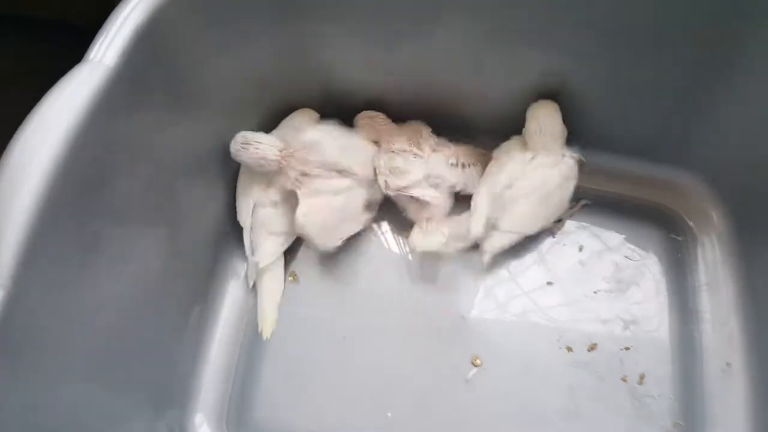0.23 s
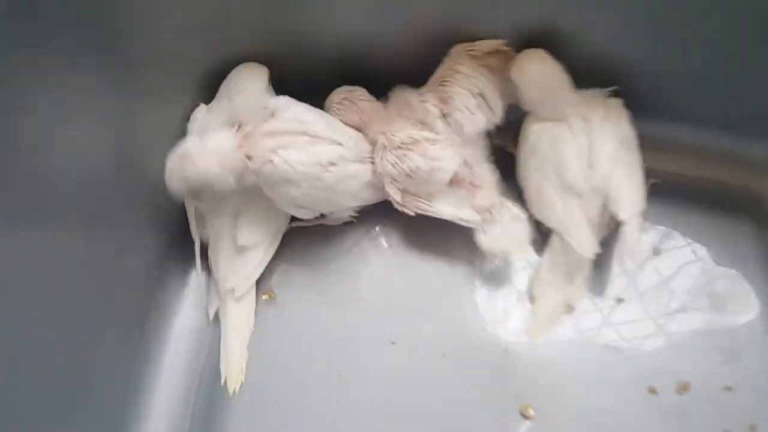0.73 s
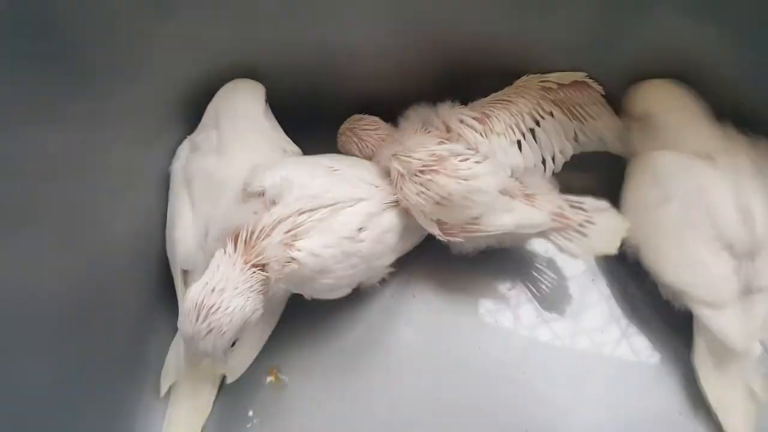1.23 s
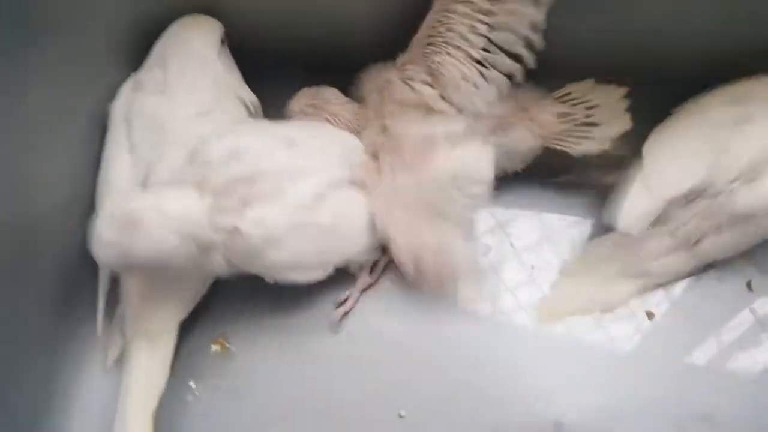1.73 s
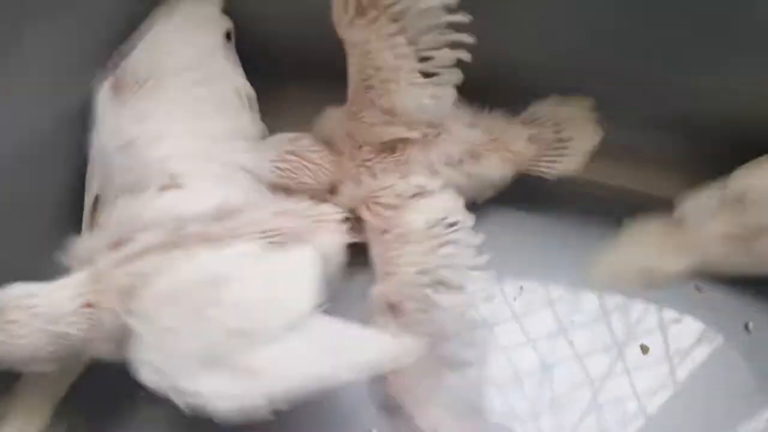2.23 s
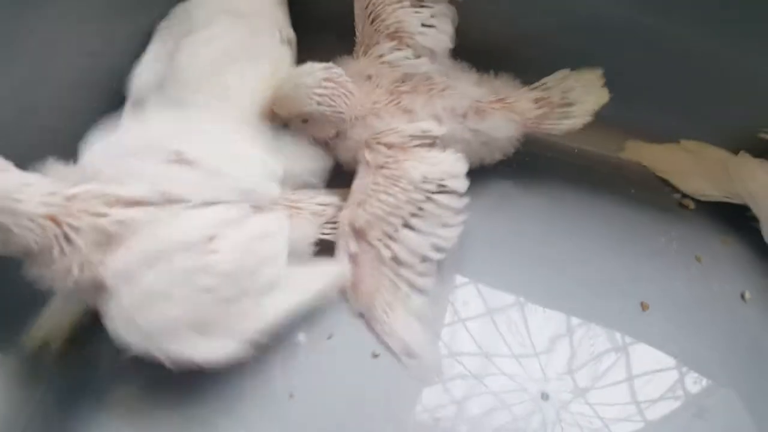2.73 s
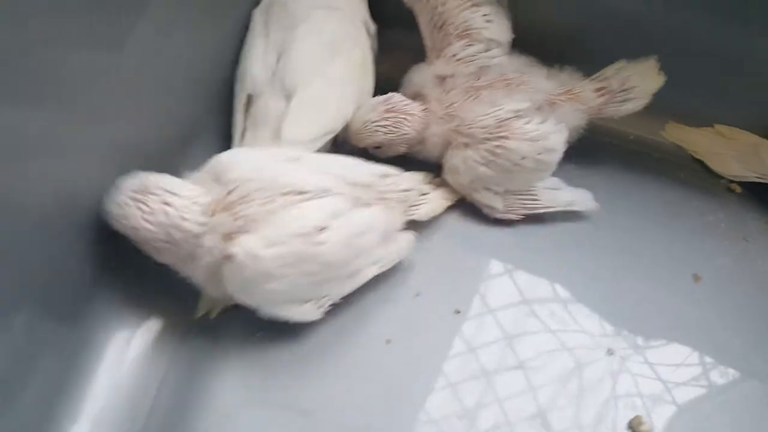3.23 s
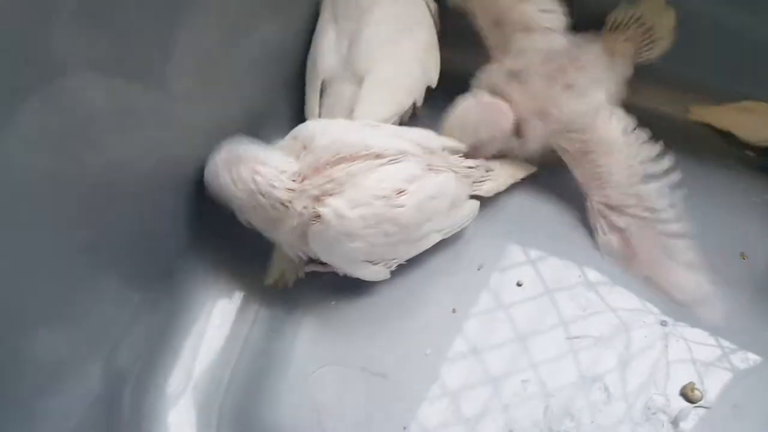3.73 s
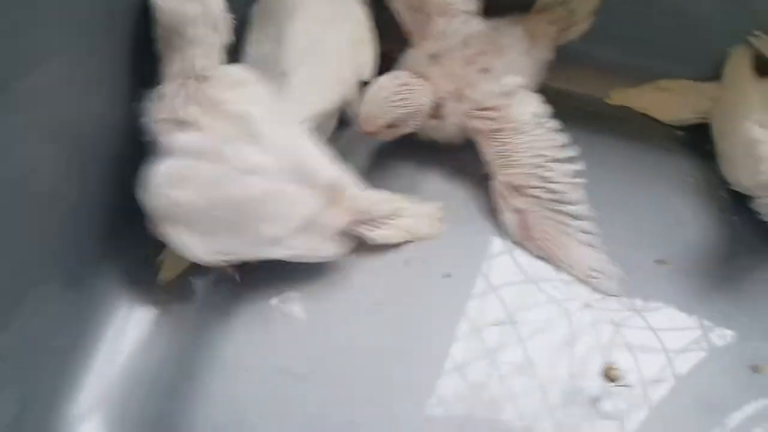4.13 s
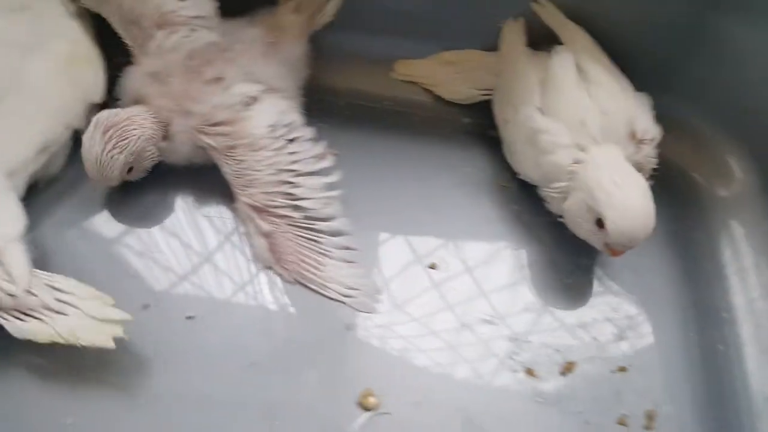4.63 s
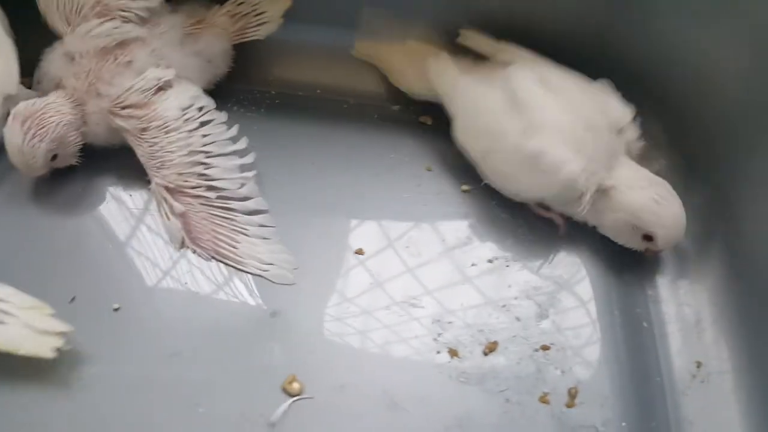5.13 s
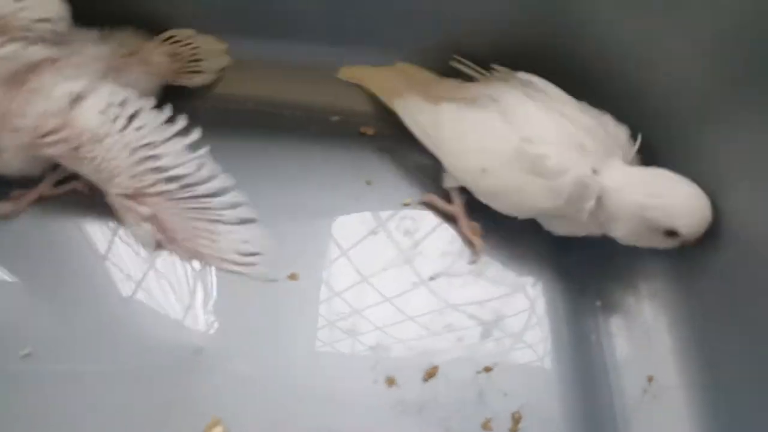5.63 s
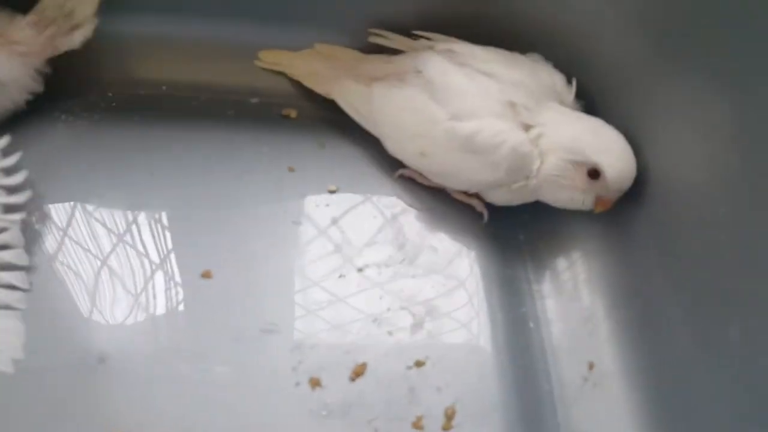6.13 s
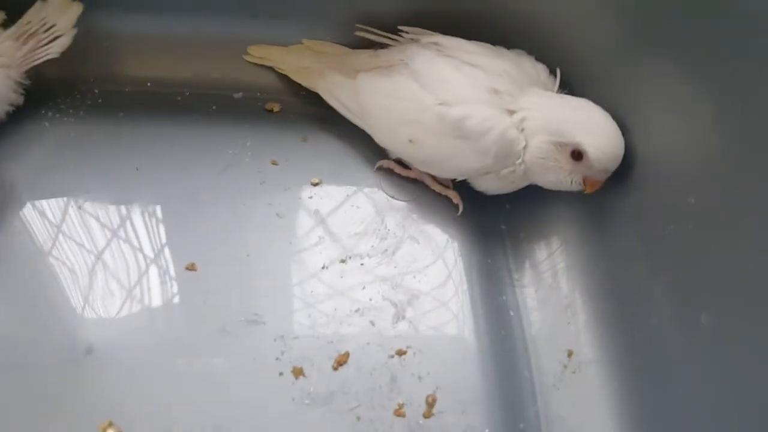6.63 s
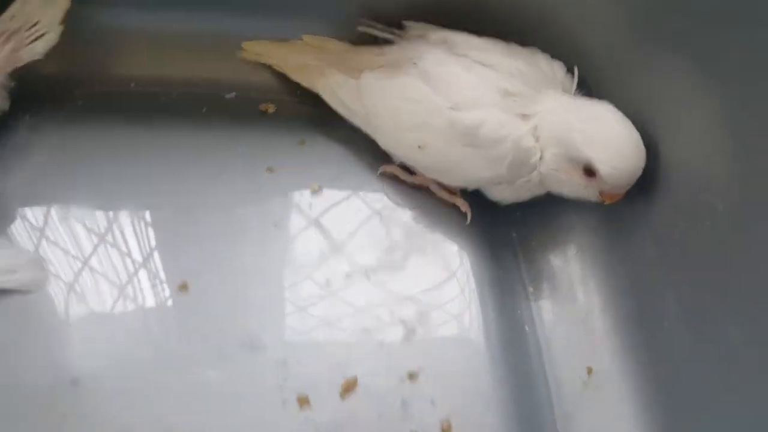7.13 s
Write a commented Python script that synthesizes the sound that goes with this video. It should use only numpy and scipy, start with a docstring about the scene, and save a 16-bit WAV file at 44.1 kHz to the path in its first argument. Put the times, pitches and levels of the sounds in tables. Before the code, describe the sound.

Young budgerigar chicks give shrill wavering cheeps and one harsh squawk while feet and wings knock and claws scratch on a plastic tub.

```python
"""Indoors, in a plastic tub: budgerigar chicks beg close to two microphone ports, the left one nearer.
Warbling cheeps and one harsh squawk are sines of unsteady pitch; the squawk adds chopped breath noise.
Feet and wings knock on the tub floor, a bank of ringing modes; claws tick and slide in noise grains.
Feathers rustle as hiss and crackle, a wing swishes as a puff of noise, and a lumpy rumble lies beneath.
Tub walls and room add echoes to voices, knocks and claws."""
import sys
import numpy as np
from scipy import signal
from scipy.fft import rfft, irfft, next_fast_len
from scipy.io import wavfile
from scipy.ndimage import uniform_filter1d

SR = 44100
rng = np.random.default_rng(int(sys.argv[2]) if len(sys.argv) > 2 else 0)


def waveform_to_disk(signal):
    """Save audio, clipped to [-1, 1], as 16-bit WAV at the path in sys.argv[1]."""
    frames = np.transpose(np.atleast_2d(signal))
    scaled = np.clip(frames, -1, 1) * 32767
    samples = np.round(scaled).astype(np.int16)
    wavfile.write(sys.argv[1], SR, samples)


N = 326340
T = np.arange(N) / SR

# bustle of the shuffling chicks: (time [s], relative level [dB])
SHUFFLE = [(0, -62), (.14, -73.5), (.3, -58), (.55, -79), (.75, -67.5), (2.3, -57), (2.55, -63.5),
           (2.9, -59), (3.4, -78), (3.7, -64), (4.2, -59), (4.62, -73), (4.9, -64), (5.08, -68),
           (5.3, -62.5), (6.75, -64.5), (6.95, -75), (7.1, -62.5)]
# rumble spectrum: (frequency [Hz], relative density [dB per Hz])
AIR_SPECTRUM = [(25, 6.5), (166, 12.5), (400, -14.5), (900, -7.5), (1300, -20), (4370, -40.5), (16000, -34)]
AIR_DB = -58
AIR_FOLLOWS, AIR_LUMPS_DB = 0.75, 2  # share of the bustle's dB that the rumble follows; its own unevenness

# claws scraping on plastic, also the feather hiss: (frequency [Hz], relative density [dB per Hz])
SCRAPE_SPECTRUM = [(600, -0.5), (1200, 2), (2300, 3), (4300, -4.5), (9000, -6), (16000, -14)]
# feet and wings on the tub floor: (time [s], relative level [dB])
KNOCKS = [(0.175, -38.5), (0.214, -27.5), (0.293, -16), (0.405, -22), (0.629, -33.5), (0.866, -21),
          (0.995, -23), (1.146, -26), (1.291, -17), (1.335, -16), (1.492, -18), (1.67, -24), (1.752, -18),
          (1.838, -22.5), (1.908, -12.5), (1.932, -20), (2.097, -16), (2.143, -12), (2.249, -19.5),
          (2.264, -17.5), (2.371, -10.5), (2.659, -18.5), (2.689, -17.5), (2.758, -15.5), (2.995, -27),
          (3.118, -31), (3.179, -21.5), (3.487, -40.5), (3.51, -34), (3.652, -32), (3.704, -30),
          (3.786, -20), (4.037, -25), (4.178, -23), (4.412, -33), (4.672, -40), (4.924, -23.5),
          (5.137, -23), (5.167, -10), (5.281, -22.5), (5.349, -14.5), (5.545, -29.5), (5.582, -18.5),
          (5.643, -26.5), (5.998, -18), (6.026, -26), (6.12, -37), (6.463, -33.5), (6.742, -34),
          (7.057, -29), (7.13, -28.5), (7.235, -53)]
# ringing modes of the floor: (frequency [Hz], level [dB], decay by 60 dB [s])
FLOOR_MODES = [(192.5, -1.5, 0.036), (315.4, -0.5, 0.056), (388, -14, 0.072), (453, 5.5, 0.018),
               (514, 8.5, 0.003), (828, 5.5, 0.015), (1550, 8, 0.00388)]
STRIKE_SPREAD_DB = 3.5  # every knock lands elsewhere and stirs the modes differently
HARD_HZ = 664  # a foot is soft: modes above this are driven less
PANEL_HZ, PANEL_LAG_S = 600, 0.00036  # floor modes above this reach the ports out of step
# claw ticks: (time [s], relative level [dB])
CLAW_TICKS = [(0.409, -16.5), (0.88, -25.5), (1.001, -24.5), (1.295, -15), (1.466, -28), (1.6643, -14),
              (1.749, -15.5), (1.928, -12), (2.0101, -30), (2.1263, -11.5), (2.371, -18), (2.4817, -28.5),
              (3.515, -26), (3.537, -28), (3.6595, -21), (3.706, -26.5), (4.1661, -12.5), (4.383, -19.5),
              (5.168, -26), (5.284, -20.5), (5.3335, -23), (5.462, -26), (5.613, -23), (5.899, -45),
              (5.922, -28), (6.439, -31), (6.49, -33)]
SLIDE_S = 0.011  # nominal 60 dB decay of a slide; each claw scales it by chance

# begging cheeps in order of time: (left minus right [dB], octave overtone [dB],
# third overtone [dB], first level [dB], middle level [dB], last level [dB])
CHEEPS = [(3.5, -1, -29, -35, -38, -46.5), (10.5, -12, -14.5, -25, -23, -23), (2, 12.5, 1, -35, -32.5, -42),
          (1, -2.5, -13.5, -21.5, -20, -18), (7.5, -19.5, -17, -29, -22, -16.5),
          (2.5, 14, -13, -36, -32.5, -44), (9.5, -2.5, -6.5, -27.5, -19, -20),
          (8, 11, -3, -30, -36.5, -38.5), (13.5, -12, -1.5, -38.5, -25, -24.5),
          (10, 5.5, 11, -38, -42, -43), (8.5, 11, 3.5, -37, -24.5, -30), (11, 10.5, -3, -23.5, -29, -30)]
# zigzag course of each loud cheep: (time [s], pitch [Hz])
LOUD_PITCH = [
    [(1.551, 2848), (1.589, 3417), (1.617, 2660), (1.701, 3352), (1.727, 2745), (1.813, 3090), (1.85, 2270)],
    [(2.714, 3017), (2.736, 3543), (2.808, 2674), (2.826, 3543), (2.836, 2848), (2.944, 2966),
     (3.006, 2319)],
    [(3.716, 2579), (3.728, 3056), (3.786, 3130), (3.8, 2671), (3.83, 3092), (3.992, 2906), (4.006, 2302)],
    [(4.691, 2459), (4.721, 3400), (4.783, 2622), (4.809, 3400), (4.893, 2556), (4.909, 3135),
     (4.977, 2394)],
    [(5.955, 2801), (6.031, 3125), (6.043, 2706), (6.077, 3303), (6.199, 2884), (6.217, 3277),
     (6.287, 2637)],
    [(6.991, 2915), (7.023, 3102), (7.085, 2826), (7.107, 3072), (7.259, 2624), (7.275, 2168),
     (7.283, 2282)],
]
# course of each soft cheep: (time [s], pitch [Hz])
SOFT_PITCH = [
    [(0.724, 3420), (0.844, 3090), (1.0, 3150)],
    [(2.162, 3197), (2.308, 3117), (2.406, 2697)],
    [(4.065, 3480), (4.097, 3650), (4.337, 3136)],
    [(5.172, 3816), (5.284, 3280), (5.419, 3260)],
    [(6.29, 2716), (6.314, 3440), (6.531, 3092)],
    [(7.285, 3595), (7.337, 3188), (7.4, 3400)],
]
COURSES = sorted(list(LOUD_PITCH) + list(SOFT_PITCH), key=lambda rows: rows[0][0])
# unsteady syrinx: (rate [per s], pitch depth [share], level depth [dB])
WARBLE = [(40, .045, 3), (120, .045, 5), (330, .025, 3.5)]
# throat colour on the overtones: (frequency [Hz], level [dB])
THROAT = [(4500, -11), (5500, -18), (6300, -33.5), (9200, -25.5), (12000, -43.5)]
LOW_LOUDER_DB = 9  # low notes come out louder, per kHz under 3 kHz
SECOND_SIDE_DB = -6  # the weaker side of the syrinx beats with the first
CRACKS_PER_S, CRACK_DROP, CRACK_S = 60, .42, .006  # random downward cracks: pitch drop scale [share]
FLUTTER_PER_S, FLUTTER, HOARSE = 600, .045, .9  # pitch flutter scale [share], and how hoarse the voice is
HALF_LINE_DB = -27  # a line at 1.5 times the pitch, before the throat colour

# squawk: (time [s], relative level [dB])
SQUAWK = [(3.162, -36.5), (3.174, -16.5), (3.225, -17.5), (3.247, -24)]
# squawk pitch and its multiples in order: (level [dB])
SQUAWK_PARTIALS_DB = [-37, 4, -32, -12.5, -11.5]
# breath noise in the squawk: (frequency [Hz], relative density [dB per Hz])
SQUAWK_RASP = [(290, -68.5), (500, -38.5), (1090, -11), (2230, 3), (4150, -16.5), (5390, -2), (8090, -14),
               (11800, -34.5), (16000, -35.5)]
SQUAWK_HZ, SQUAWK_RATE_HZ = 2320, 170  # middle pitch; rate of its bursts
SQUAWK_SWING = 0.19  # the pitch arches by this share in every burst
SQUAWK_ROOM_DB = -21  # the squawk rings longer in the room

# echoes off the tub walls, the delay stretched at each port: (delay [s], level [dB])
WALL_ECHOES = [(.0009, -13), (.0023, -10), (.0041, -10)]
ROOM_T60_S, ROOM_DB, ROOM_CUT_HZ = 0.21, -24.5, 9000
PORT_LAG_S, CHEEP_LAG_S = 0.000332, .00027  # the right port hears later
# how the ports colour a voice: (frequency [Hz], left minus right [dB])
PORT_SIDE = [(700, -5), (1290, 5), (2380, -2.5), (4400, -8.5), (9000, -7), (15000, 4.5)]
# the ports move over the tub: (time [s], left minus right [dB])
SCUFFLE_PAN = [(0, -1), (2.7, -0.5), (3.8, -3), (5, 2), (7.4, 7)]
CUTOFF_HZ = 16650


def amp(db):
    """Amplitude of a level in dB."""
    return 10 ** (np.asarray(db) / 20)


def unit(x):
    """Scales a signal to rms 1."""
    return x / np.sqrt(np.mean(x ** 2) + 1e-20)


def columns(rows):
    """Draws each column of a table as a line over time."""
    s, *rest = np.transpose(rows)
    return [np.interp(T, s, c) for c in rest]


def drift(rate):
    """Smooth random wandering of rms near 1, quicker at a higher rate."""
    r = np.exp(-3 * np.pi * rate / SR)
    smoother = [1, -2 * r, r * r]
    slow = signal.lfilter([1], smoother, rng.standard_normal(N + 9000))
    return unit(signal.lfilter([1], smoother, unit(slow))[9000:])


def spectrum_line(spectrum):
    """dB at every FFT frequency, interpolated over log frequency."""
    hz, db = np.transpose(spectrum)
    return np.interp(np.log(np.fft.rfftfreq(N, 1 / SR) + 1), np.log(hz), db)


def colour(x, spectrum):
    """Shapes noise by a spectrum in dB per Hz; white noise of rms 1 keeps about that rms."""
    return irfft(rfft(x) * unit(amp(spectrum_line(spectrum))), N)


def gate(start, end, edge_s):
    """Opens to 1 between two times, with straight edges."""
    return np.clip(np.minimum(T - start, end - T) / edge_s, 0, 1)


def grains(per_s, spread_db):
    """Random clicks; the wider the spread, the more a few outgrow the rest."""
    sizes = amp(spread_db * np.minimum(rng.exponential(1, N), 4)) * rng.choice([-1, 1], N)
    return unit(sizes * (rng.random(N) < per_s / SR))


def air_rumble(bustle_db):
    """Lumpy noise that rises with the bustle, mostly shared by the ports."""
    shared, left, right = [colour(rng.standard_normal(N), AIR_SPECTRUM) for draw in range(3)]
    follow_db = AIR_FOLLOWS * (bustle_db - bustle_db.mean())
    level = amp(AIR_DB + follow_db + AIR_LUMPS_DB * drift(9.6))
    return level * (shared + .4 * np.array([left, right]))


def feathers(rustle_db):
    """Soft hiss, its own at each port, with a shared fine dry crackle of quills on plastic."""
    clumps = amp(rustle_db + 6 + 2.5 * drift(25))
    ticks = .9 * grains(110 * amp(7.0 * drift(10)), spread_db=4.0)
    quill = unit(rng.standard_normal(130) * np.hanning(130)) / np.sqrt(130)
    ticks = np.convolve(ticks, quill, "same")
    return [clumps * colour(rng.standard_normal(N) + ticks, SCRAPE_SPECTRUM) for port in range(2)]


def tub_floor(rumble_db):
    """Knocks, small random pats and steady rubbing drive the floor modes; soft contacts miss the high ones."""
    pats = amp(rumble_db - 21.5) * grains(60 * amp(5.5 * drift(3.9)), spread_db=3.5)
    rubbing = amp(rumble_db - 39.0) * rng.standard_normal(N)
    soft_contact = np.hanning(30) / 15
    pats = np.convolve(pats + rubbing, soft_contact)[:N]

    scuffs = np.zeros(N)  # the foot drags on after each knock
    for (s, db), drag_s in zip(KNOCKS, rng.uniform(0.022, 0.17, len(KNOCKS))):
        scuffs[round(s * SR):][:4000] += amp(db - 37 - 60 * T[:4000] / drag_s)
    pats += scuffs * grains(700, spread_db=2.5)

    low_high = np.zeros((2, N))
    chance = rng.normal(0, 1, (len(KNOCKS), len(FLOOR_MODES)))
    for k, (hz, mode_db, t60) in enumerate(FLOOR_MODES):
        force = pats.copy()
        softness = 1 + (hz / HARD_HZ) ** 2
        for (s, db), luck in zip(KNOCKS, chance):
            force[round((s + .002) * SR)] -= amp(db - 6.5 + STRIKE_SPREAD_DB * luck[k]) / softness
        r, w = amp(-60 / (t60 * SR)), 2 * np.pi * hz / SR
        resonator = [0, np.sin(w)], [1, -2 * r * np.cos(w), r * r]
        low_high[int(hz > PANEL_HZ)] += amp(mode_db) * signal.lfilter(*resonator, force + 1e-18)
    # a thin floor radiates little bass
    return signal.sosfilt(signal.butter(2, 220, "high", fs=SR, output="sos"), low_high)


def claws():
    """Each claw ticks, then slides in dense tiny slips that die away."""
    level = np.zeros(N)
    for (s, db), luck in zip(CLAW_TICKS, rng.uniform(0.053, 2.6, len(CLAW_TICKS))):
        at = round(s * SR)
        level[at:at + 3000] += amp(db - 6.0 - 60 * T[:3000] / (luck * SLIDE_S))
    slips = colour(grains(7700, spread_db=0.0), SCRAPE_SPECTRUM)
    return uniform_filter1d(level, size=90) * slips


def per_call(column):
    """A column of the cheep table, held until each call ends."""
    ends = sorted(rows[-1][0] for rows in COURSES)
    call = np.minimum(np.searchsorted(ends, T - .012), len(ends) - 1)
    return uniform_filter1d(np.array(CHEEPS, float)[call, column], size=300)


def syrinx_side(level, pitch):
    """A near sine that zigzags, cracks and flutters about the course it is given."""
    strain = np.clip((pitch - 2150) / 750, .2, 1)  # low notes hold steadier
    for rate, share, shake_db in WARBLE:
        pitch = pitch * np.exp(strain * share * np.tanh(drift(rate)))
        level = level * amp(strain * shake_db * np.tanh(drift(rate)))
    fits = np.maximum(1 + drift(42.1), 0)  # the hoarse flutter comes in fits
    pitch = pitch * np.exp(strain * HOARSE * FLUTTER * fits * np.tanh(drift(FLUTTER_PER_S)))

    crack_len = round(CRACK_S * SR)
    crack_shape = signal.windows.tukey(crack_len, .4) * np.linspace(1.2, 0, crack_len)
    cracks = np.tanh(np.convolve(rng.random(N) < CRACKS_PER_S / SR, crack_shape)[:N])
    turn = 2 * np.pi * np.cumsum(pitch * (1 - strain * CRACK_DROP * cracks)) / SR

    voice = np.sin(turn)
    for k, own_db in [(1.5, HALF_LINE_DB), (2, per_call(1)), (3, per_call(2))]:
        throat_db = np.interp(k * pitch, *np.transpose(THROAT)) + own_db
        overtone = np.sin(k * turn + .55 * drift(500))
        voice += amp(throat_db + 11 * np.tanh(drift(110))) * overtone
    return level * voice * (1 - .45 * cracks)


def cheeps():
    """Each call follows its course; both sides of the syrinx sing it, each unsteady in its own way."""
    pitch, = columns(np.concatenate(COURSES))
    db, on = np.full(N, CHEEPS[0][3], float), 0
    for rows, (*_, first_db, mid_db, last_db) in zip(COURSES, CHEEPS):
        start, end = rows[0][0], rows[-1][0]
        times = [start, (start + end) / 2, end]
        db[T >= start] = np.interp(T[T >= start], times, [first_db, mid_db, last_db])
        on = on + gate(start - .004, end + .004, .009)
    low_boost_db = LOW_LOUDER_DB * (3 - pitch / 1000)
    level = np.minimum(on, 1) * amp(uniform_filter1d(db, size=300) + low_boost_db)
    return syrinx_side(level, pitch) + amp(SECOND_SIDE_DB) * syrinx_side(level, pitch)


def squawk():
    """A harsh tone and breath noise chopped into quick bursts, the pitch arching in each."""
    db, = columns(SQUAWK)
    burst = np.cos(np.pi * SQUAWK_RATE_HZ * (T - 3.1745)) ** 2
    pitch = SQUAWK_HZ * np.exp(SQUAWK_SWING * (burst - .5) + 0.051 * drift(500))
    turn = 2 * np.pi * np.cumsum(pitch) / SR
    tone = sum(amp(p) * np.sin((k + 1) * turn) for k, p in enumerate(SQUAWK_PARTIALS_DB))
    rasp = colour(rng.standard_normal(N), SQUAWK_RASP)
    level = gate(SQUAWK[0][0], SQUAWK[-1][0], .003) * amp(db)
    return level * (.35 + 1.1 * burst) * (.7 * tone + .8 * rasp)


def swish():
    """A wing sweeps the air: a smooth puff of bright noise, its own at each port."""
    s, half_s, db, hz = 6.6, .05, -51, 10500  # time, half length, level, centre
    band = signal.butter(2, [hz / 1.22, hz * 1.13], "band", fs=SR, output="sos")
    noise = unit(signal.sosfilt(band, rng.standard_normal((2, N))))
    return amp(db) * np.exp(-((T - s) / half_s) ** 2) * noise


def ports(*sources):
    """Carries each (sound, pan dB, lag s, room dB, wall share) to both ports with wall and room echoes."""
    size = next_fast_len(N + SR)
    w = 2j * np.pi * np.fft.rfftfreq(size, 1 / SR)
    dull = 1 / (1 + w / (2 * np.pi * ROOM_CUT_HZ))
    out = np.zeros((len(sources), 2, N))
    for side, stretch in enumerate([.8, 1.27]):
        walls = sum(amp(db) * np.exp(-w * s * stretch) for s, db in WALL_ECHOES)
        room = 0
        for lag in rng.uniform(0.0082, 0.05, 8):  # eight dulling echo loops
            loop = amp(-60 * lag / ROOM_T60_S) * dull * np.exp(-w * lag)
            room = room + loop / (1 - loop)
        for k, (x, pan_db, lag_s, room_db, walled) in enumerate(sources):
            path = np.exp(-w * lag_s * side) + walled * walls + amp(room_db) * room
            panned = x * amp(pan_db / 2 * (1 - 2 * side))
            out[k, side] = irfft(rfft(panned, size) * path, size)[:N]
    return out


def scene():
    """Sums the tub, the chicks and the rumble at the two ports."""
    bustle_db, = columns(SHUFFLE)
    pan_db, = columns(SCUFFLE_PAN)
    thud, rap = tub_floor(bustle_db + 5.5)
    low, high, ticks, calls, harsh = ports(
        (thud, pan_db, .00005, ROOM_DB, .2),
        (rap, pan_db, PANEL_LAG_S, ROOM_DB, .6),
        (claws(), 1.5 * pan_db + 1, PORT_LAG_S, ROOM_DB, 1),
        (cheeps(), per_call(0), CHEEP_LAG_S, ROOM_DB, 1),
        (amp(3.5) * squawk(), 0, PORT_LAG_S, SQUAWK_ROOM_DB, .4))
    left_right = np.array([[1], [-1]])
    shade = amp(spectrum_line(PORT_SIDE) / 2 * left_right)
    voices = irfft(rfft(calls + harsh) * shade, N)
    rustle = feathers(bustle_db) * amp(pan_db / 2 * left_right)
    return air_rumble(bustle_db) + rustle + low + high + ticks + voices + swish()


def record(dry):
    """Overloads are cut flat, then a steep low-pass removes the top."""
    low_pass = signal.cheby2(20, 70, CUTOFF_HZ, fs=SR, output="sos")
    return signal.sosfilt(low_pass, np.clip(dry, -1, 1))


dry = scene()
out = record(dry)
waveform_to_disk(out)
```